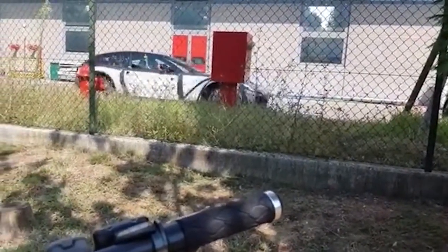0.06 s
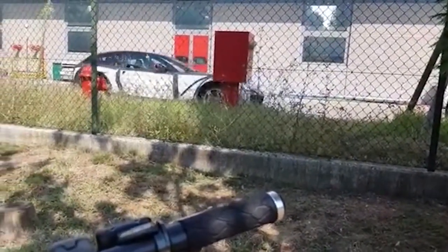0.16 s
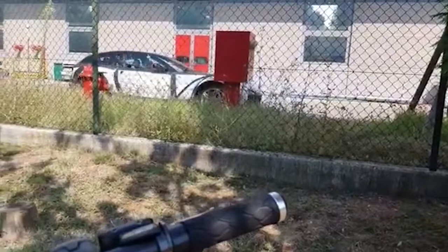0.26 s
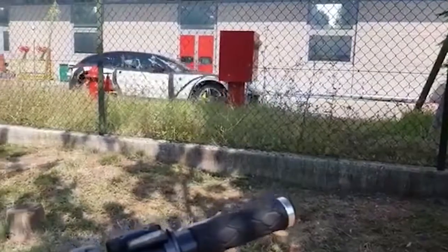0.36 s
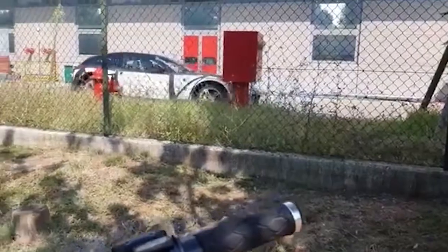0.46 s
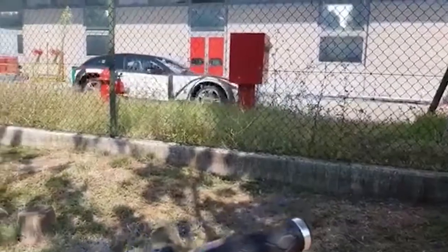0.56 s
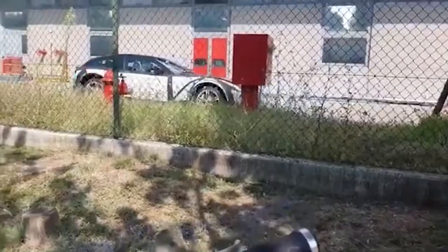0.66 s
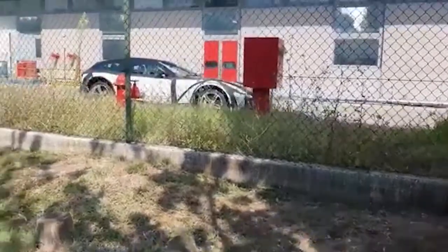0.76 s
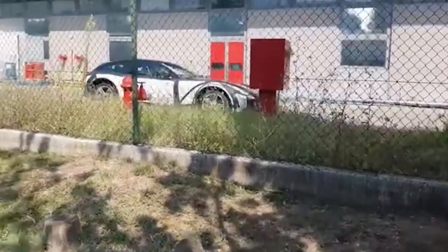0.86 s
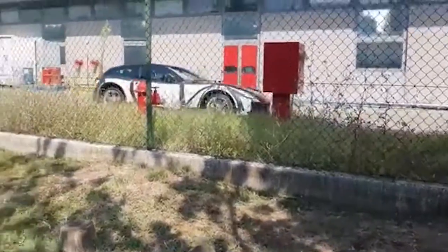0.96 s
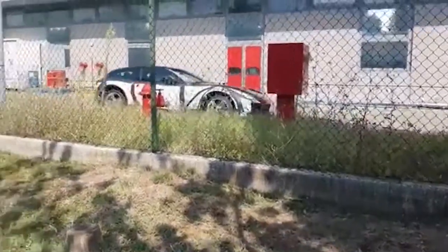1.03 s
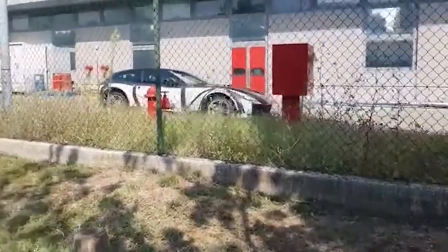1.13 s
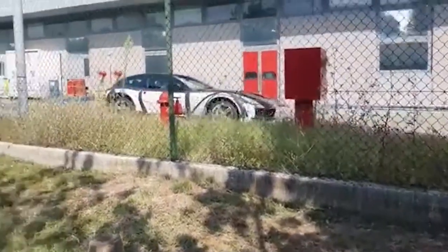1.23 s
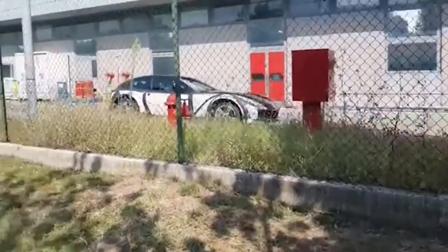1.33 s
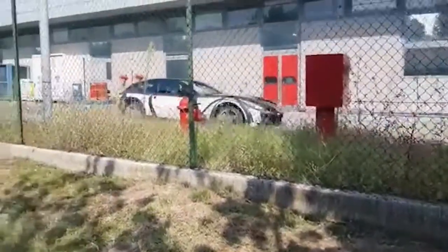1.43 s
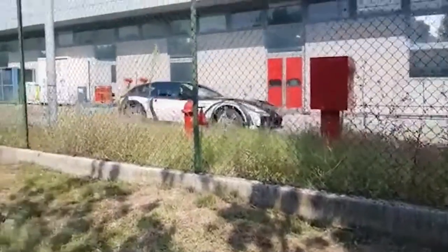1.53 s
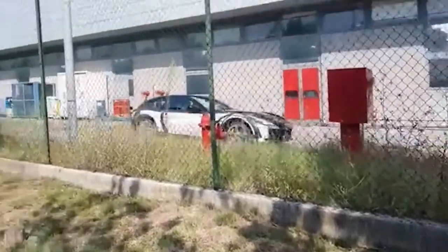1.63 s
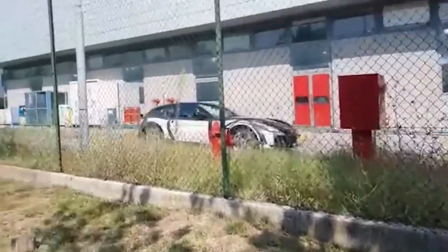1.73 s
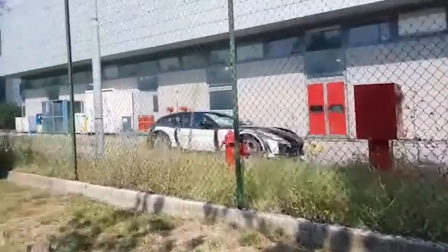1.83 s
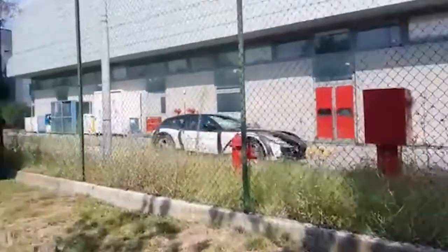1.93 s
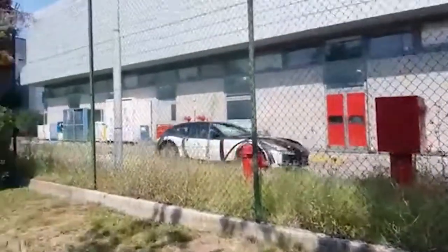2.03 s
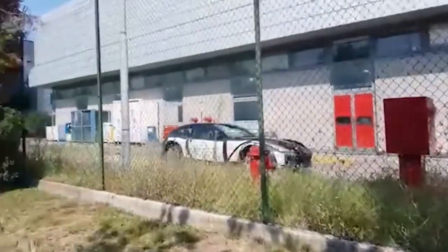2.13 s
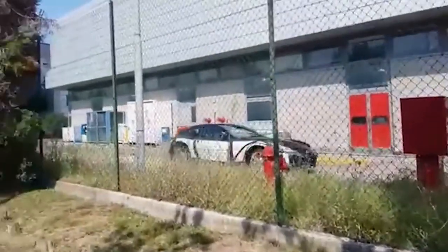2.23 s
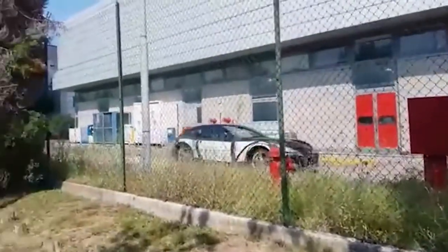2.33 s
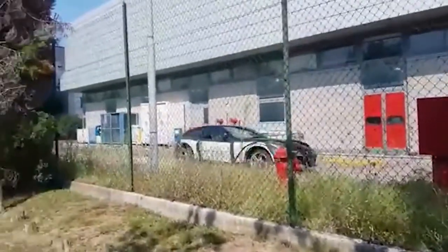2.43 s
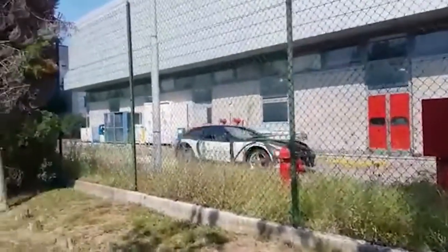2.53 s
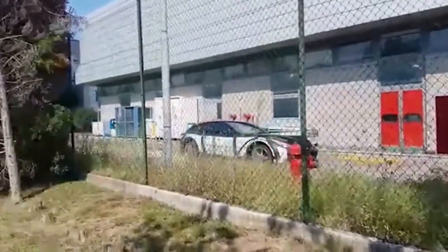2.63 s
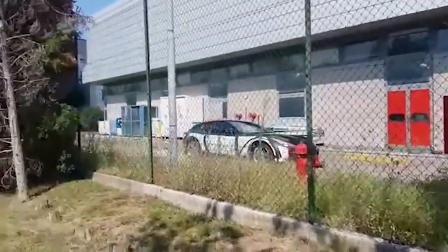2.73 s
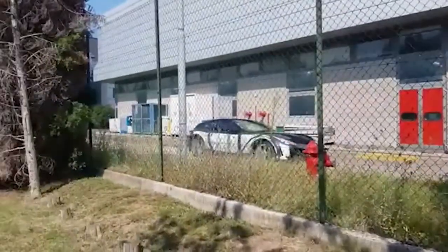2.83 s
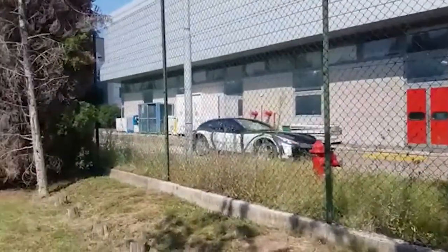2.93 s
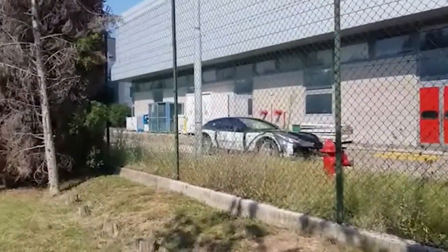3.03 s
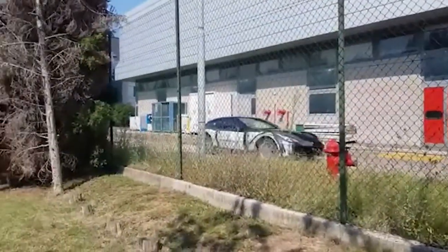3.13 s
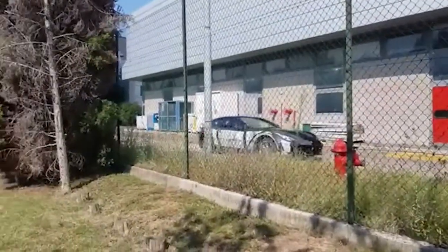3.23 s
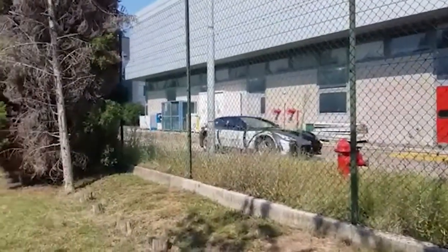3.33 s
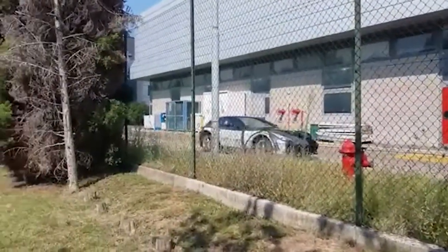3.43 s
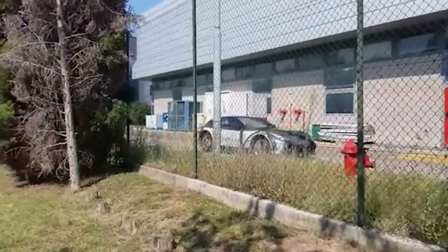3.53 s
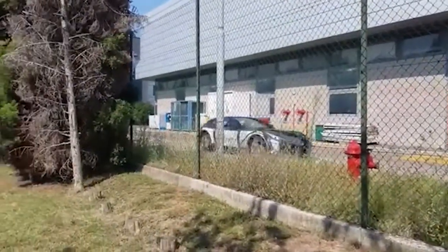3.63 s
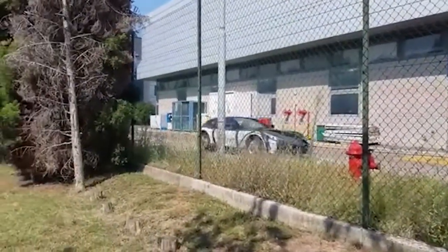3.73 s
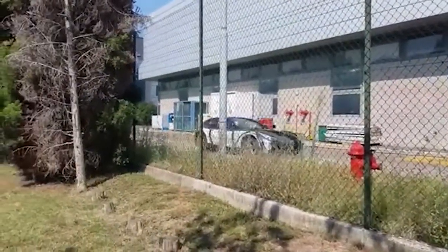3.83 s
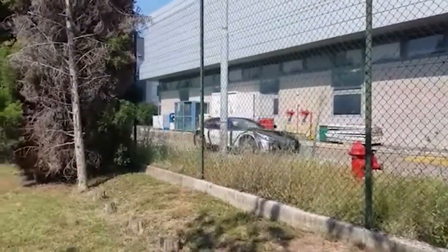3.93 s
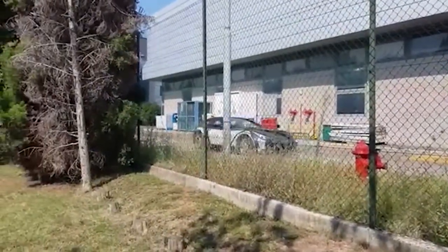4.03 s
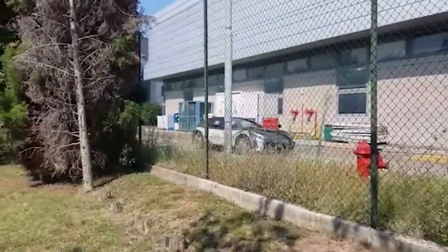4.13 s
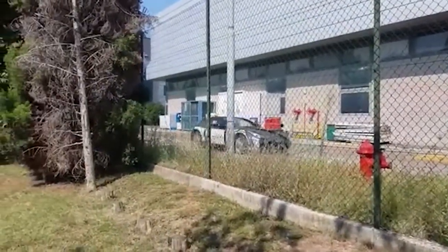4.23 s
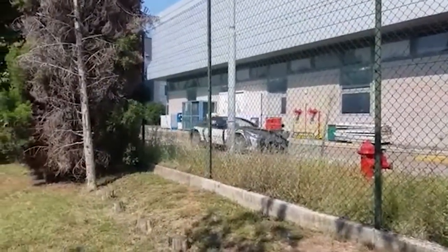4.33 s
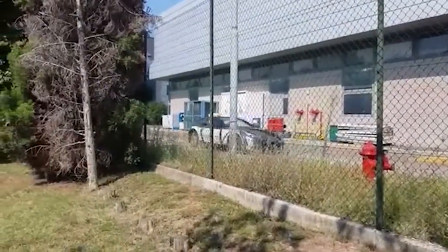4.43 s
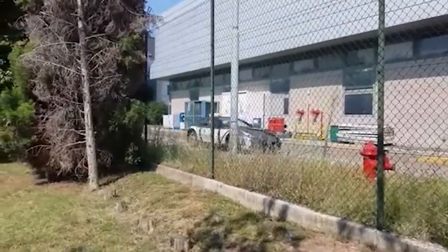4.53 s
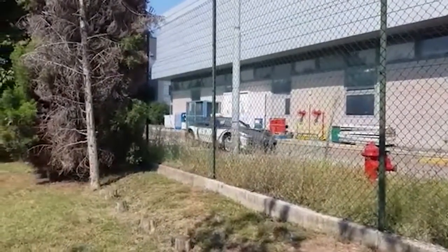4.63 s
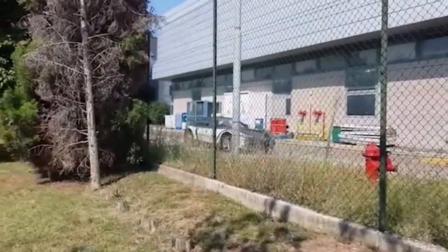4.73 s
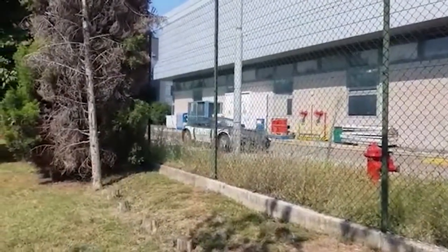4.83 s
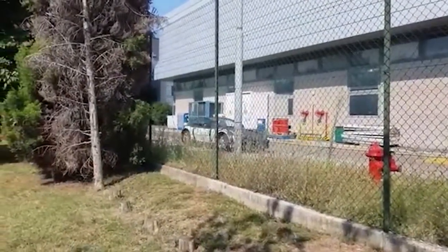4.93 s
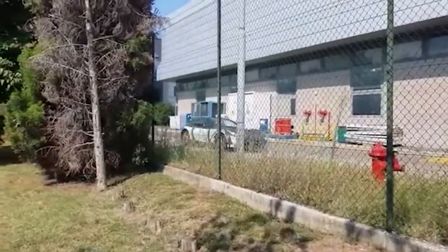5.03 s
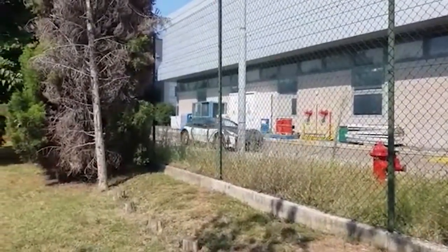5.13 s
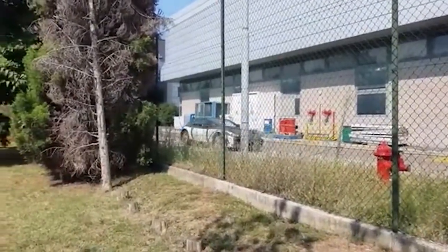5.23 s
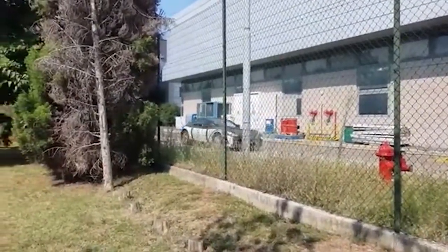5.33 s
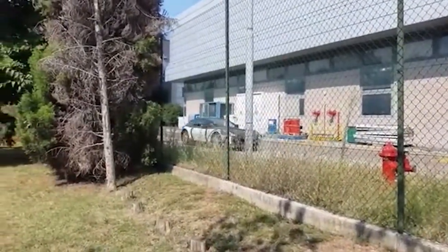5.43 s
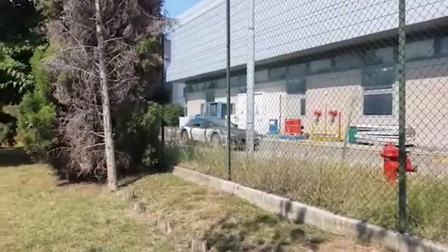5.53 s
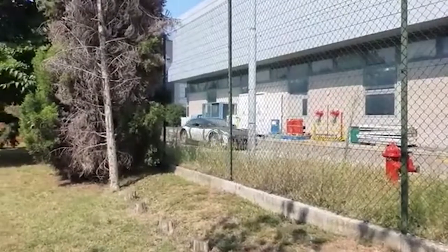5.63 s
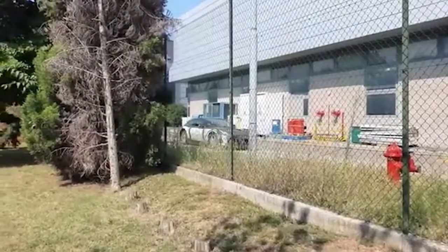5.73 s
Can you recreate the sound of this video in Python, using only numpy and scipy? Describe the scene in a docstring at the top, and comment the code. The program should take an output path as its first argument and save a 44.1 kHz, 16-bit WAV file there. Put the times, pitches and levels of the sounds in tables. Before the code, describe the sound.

A big twelve-cylinder car idles with a deep throbbing boom and burble outdoors, while the hand holding the camera clicks and rubs midway.

```python
"""A twelve-cylinder car creeps across a yard at little more than idle, some way from a hand-held camera.
From the start its exhaust booms, made of tones, and burbles, made of pulses and noise, over engine whirr and hiss.
Faint dry rustles of noise come early, while delayed copies let the wall's echo slide down through the sound.
Near the middle the hand clicks and rubs: pressure pushes, casing rings and noise, mostly in the left microphone.
Then two dull bumps, dying low tones, reach both microphones; a last stroke of skin ends it."""
import sys
import numpy as np
from scipy import signal
from scipy.fft import rfft, irfft
from scipy.io import wavfile

SR = 44100
rng = np.random.default_rng(int(sys.argv[2]) if len(sys.argv) > 2 else 0)


def pcm_store(signal):
    """Save signal as 16-bit PCM."""
    levels = np.round(np.clip(np.atleast_2d(signal), -1, 1) * 32767)
    wavfile.write(sys.argv[1], SR, levels.astype(np.int16).T)


N = 254898
T = np.arange(N) / SR  # time of every sample, in s

# the uneven beat between the two cylinder banks, before trims: [t/s, level/dB]
BANK_BEAT = [(0.03, -60), (0.22, -41.5), (0.4, -32.5), (0.8, -44), (0.94, -57.5), (1.22, -32.5), (1.8, -38),
             (2.3, -37), (2.6, -41.5), (3.4, -43.5), (4.3, -52), (4.7, -43), (5.1, -40.5), (5.7, -38)]


def boom(bank_cycles, boom_db=-0.2, lope_db=0, overtone_db=0.0, port_phase=0.13, left_db=1.0, sway_db=0.3):
    """The lowest exhaust tones: both banks firing, their uneven beat and two overtones, in step so that they throb."""
    # both banks together, swelling and fading as the car rolls, before trims: [t/s, level/dB]
    boom_levels = [(0.03, -20.5), (0.65, -22.5), (1.02, -18.5), (1.18, -23.5), (1.26, -45), (1.32, -24),
                   (1.43, -43), (1.8, -27.5), (2.2, -23.5), (2.48, -29), (2.59, -25), (2.67, -33.5),
                   (2.91, -24.5), (3.38, -26.5), (3.46, -33), (3.89, -28), (4.4, -31.5), (4.47, -39.5),
                   (4.87, -25.5), (5.1, -29), (5.13, -59), (5.19, -32), (5.7, -30), (5.75, -30)]
    # overtones at three and four times the bank rate, before trims: [t/s, third level/dB, fourth level/dB]
    overtone_levels = [(0, -46, -44), (0.25, -33, -36), (0.55, -38.5, -35), (1.1, -36, -38.5),
                       (1.45, -31, -48), (1.8, -39.5, -42), (2.12, -31.5, -51.5), (2.8, -43.5, -48),
                       (3.6, -45, -51), (4.4, -49, -54), (5.1, -58.5, -58), (5.4, -57, -42.5),
                       (5.7, -64, -47.5)]
    shake = 1 + .05 * wander(18)
    slow = wander(.8)
    # echoes off the buildings shift the tone a little between the two microphones
    ports = np.array([[1], [-1]])
    firing = np.cos(2 * np.pi * 2 * bank_cycles + ports * port_phase * slow / 2)
    lean_db = ports * (left_db + sway_db * wander(1.8)) / 2
    out = gain_of(follow(boom_levels)[0] + boom_db + lean_db) * shake * firing
    third_db, fourth_db = follow(overtone_levels)
    orders = [
        (1, follow(BANK_BEAT)[0] + lope_db),
        (3, third_db + overtone_db),
        (4, fourth_db + overtone_db),
    ]
    for k, level_db in orders:
        # a complex factor disturbs both strength and phase
        unrest = 1 + .13 * (wander(9) + 1j * wander(9))
        out += gain_of(level_db) * (unrest * np.exp(2j * np.pi * k * bank_cycles)).real
    return -np.sqrt(2) * out


def car(bank_cycles, pulse_share=0.71, tick_share=0.73, pipe_width_hz=330):
    """Exhaust pulses burble in the pipes over a smooth roar; valve ticks, belts and fans whirr in the engine bay."""
    # the pipes' main resonance drifts as the car rolls on, before its waver: [t/s, f/Hz]
    pipe_curve = [(0, 420), (1.2, 358), (1.6, 361), (2, 364), (2.3, 333), (2.8, 350), (3.6, 312.5),
                  (4.3, 335), (4.8, 373), (5.78, 351)]
    # relative spectra of the burble, the roar, the fans, the engine bay, its whirr and the hiss: [f/Hz, level/dB]
    burble_spectrum = [(100, -18.5), (170, -8), (240, 0), (280, 4), (380, -4.5), (450, -8), (540, -6.5),
                       (660, -9), (800, -26.5), (1300, -26.5), (3000, -72)]
    roar_spectrum = [(110, -13.5), (210, 12), (300, 3), (620, 3), (1000, -64.5)]
    fan_spectrum = [(1800, -24.5), (2500, -1.5), (3000, 4.5), (3500, -6), (4300, -31), (6000, -54.5)]
    bay_spectrum = [(300, -31.5), (600, -0.5), (750, 5.5), (1000, 2.5), (1270, 3.5), (1600, 2),
                    (2100, -25.5), (4000, -83.5)]
    whirr_spectrum = [(800, -3), (1400, -7), (1800, 6.5), (2100, 7), (2500, 2), (3100, -7.5), (3700, -26.5),
                      (4500, -51.5), (7000, -62)]
    hiss_spectrum = [(1500, -33), (3000, 5), (3800, 5.5), (4500, -1.5), (5300, 3.5), (6200, 5), (6550, -6),
                     (6800, -77), (7600, -64)]

    pipe_hz = follow(pipe_curve)[0] + 11 * wander(2.8)
    # the pipe comes through quickly, then fades
    pipe_db = 4 + swell(1.5, rise_db_per_s=5.5, fall_db_per_s=2)
    pulses = yard(firings(bank_cycles, uneven=2.0, jitter=0.068), t60=0.41)
    drive = pulse_share * pulses + puffs(bank_cycles, depth=0.062)
    gas = colour(drive, burble_spectrum)
    exhaust = gas + gain_of(pipe_db) * pipe_ring(gas, pipe_hz, pipe_width_hz)
    # burble grows and roar sinks as the tailpipes come out from behind the bodywork
    burble_db = heard(side_db=-43, turn_db=2) - 3.5 * (1 - opened())
    burble = gain_of(burble_db) * exhaust
    roar_db = heard(side_db=-41.5, turn_db=-14) - 11 * opened()
    roar = gain_of(roar_db) * colour(puffs(bank_cycles, depth=0.12), roar_spectrum)

    # fans behind the grille come forward once the car is nose-on
    fan_db = heard(side_db=-66.5, turn_db=13.5) + 2.1 * wander(18)
    fans = gain_of(fan_db) * colour(puffs(bank_cycles, depth=0.083), fan_spectrum)
    ticks = tick_share * yard(firings(bank_cycles, uneven=3.3, jitter=0.66), t60=0.39) + noise()
    bay_db = heard(side_db=-44, turn_db=-2.5) + 0.7 * wander(25)
    bay = gain_of(bay_db) * colour(ticks, bay_spectrum)
    # the whirr flares as the grille sweeps past the camera
    flare_db = 3 * np.exp(-((T - 2.25) / 0.42) ** 2)
    whirr_db = heard(side_db=-48, turn_db=3) + flare_db + 1.0 * wander(39)
    whirr = gain_of(whirr_db) * colour(ticks, whirr_spectrum)
    # the shifted hand shades the microphones from the hiss
    shade_db = -3 * ease_in(2.4, 0.017)
    hiss_db = heard(side_db=-52, turn_db=-5) + shade_db + 1.5 * wander(20)
    hiss = gain_of(hiss_db) * colour(noise(), hiss_spectrum)
    return passing(burble + roar + fans + bay + whirr + hiss)


def firings(bank_cycles, uneven, jitter, count=12):
    """One pulse a firing; each cylinder has its own strength, and no two cycles are quite alike."""
    at = np.flatnonzero(np.diff(np.floor(2 * bank_cycles)))  # two banks: two firings a cycle
    cylinders = 1 + uneven * evened(rng.standard_normal(count))
    pulses = np.zeros(N)
    pulses[at] = cylinders[np.arange(len(at)) % count] + jitter * rng.standard_normal(len(at))
    return pulses


def puffs(bank_cycles, depth):
    """Gas noise that surges with each firing of a bank."""
    return evened(noise() * (1 + depth * np.cos(2 * np.pi * bank_cycles)))


def pipe_ring(x, hz, width_hz, cut_on_hz=240):
    """The tailpipe's resonance: two resonators in a row, with the bass below them cut steeply."""
    flank = signal.butter(4, cut_on_hz, "high", fs=SR, output="sos")
    ringing = resonate(resonate(x, hz, width_hz), hz, width_hz)
    return evened(signal.sosfilt(flank, ringing))


def heard(side_db, turn_db):
    """Level in dB of one part of the car: it follows the whole car and changes as the car turns."""
    # how much of the car reaches the camera; only its changes around the average count: [t/s, level/dB]
    car_levels = [(0.0, -42), (0.68, -40), (1.88, -42), (2.48, -42), (3.22, -44.5), (3.57, -46),
                  (4.33, -44.5), (5.09, -41.5), (5.78, -41)]
    car_db = follow(car_levels)[0]
    return side_db + turn_db * turned() + car_db - car_db.mean()


def turned():
    """How far the car has swung round: 0 side-on, 1 nose-on."""
    return ease_in(2.18, 0.67)


def opened():
    """How far the tailpipes have come out from behind the bodywork, 0 to 1."""
    return ease_in(1.3, 0.098)


def drone(bank_cycles, unrest=0.52):
    """The tailpipes pick out a few multiples of the bank rate as a faint, wavering drone."""
    # droning tones, as multiples of the bank rate: [multiple]
    drone_orders = (7, 8, 9, 10)
    # their levels side-on, before the waver: [level/dB]
    drone_levels = (-58, -56.5, -53.5, -58)
    out = 0
    for k, level_db in zip(drone_orders, drone_levels):
        waver = 1 + unrest * np.array([wander(1.7) + 1j * wander(2.2) for side in range(2)])
        tone = (waver * np.exp(2j * np.pi * k * bank_cycles)).real
        out = out + gain_of(heard(level_db, turn_db=5.5)) * tone
    return out


def sough(bank_cycles, width_hz=170):
    """A narrow band of the engine bay's rush stands out at first, and sinks as the car rolls."""
    # centre and level of the band: [t/s, f/Hz, level/dB]
    rush_band = [(0, 1320, -53.5), (.6, 1260, -48.5), (.95, 1225, -52), (1.35, 1057, -46), (1.7, 888, -56),
                 (2.3, 795, -70)]
    hz, level_db = follow(rush_band)
    band = resonate(resonate(puffs(bank_cycles, depth=.2), hz, width_hz), hz, width_hz)
    return gain_of(level_db) * evened(band)


def yard(x, t60, change_hz=0.695, count=3):
    """Scattered reflections from ground and wall: different at each microphone, changing as the car rolls."""
    t, out = T[:SR // 3], 0
    for k in range(count):
        # random reflections, dying by 60 dB in t60 seconds
        taps = rng.standard_normal((2, len(t))) * gain_of(-60 * t / t60)
        # slow cosines blend one pattern into the next
        share = np.cos(np.pi * (change_hz * T + k / count))
        out = out + signal.oaconvolve((share * x)[None], taps, axes=1)[:, :N]
    return evened(out)


def passing(x, scatter=0.084, drift=.3, port_gap_s=.0001, count=8):
    """Echoes add delayed copies: the wall's peaks slide down as the car rolls, over a steady hollow tint."""
    # the echo off the wall: [t/s, delay/ms, share of the direct sound]
    wall_echo = [(0, 1.6, 0.25), (0.5, 1.58, 0.24), (0.85, 1.68, 0.24), (1.1, 2.06, 0.41),
                 (1.35, 2.16, 0.23), (1.65, 2.65, 0.43), (2.0, 3.1, 0.22), (2.3, 3.2, 0.29),
                 (3.4, 3.6, 0.45), (4.4, 3.56, 0.075), (5.78, 3.6, 0.023)]

    def delayed(seconds):
        return np.array([np.interp(T - lag, T, side, left=0) for lag, side in zip(seconds, x)])

    wall_ms, wall_share = follow(wall_echo)
    wall_s = wall_ms / 1000
    wall = wall_share * delayed([wall_s, wall_s])
    # a dull, inverted echo makes the car sound slightly hollow
    hollow_s, hollow_top_hz = 4.17 / 1000, 1100
    hollow_share = 0.22 * opened()
    hollow = hollow_share * dulled(delayed([hollow_s, hollow_s]), hollow_top_hz)
    out = x + wall - hollow
    # faint scattered echoes, each with its own drifting delay
    for path, speed, angle in rng.uniform(-1, 1, (count, 3)):
        lag = (.017 + .013 * path) * np.exp(drift * speed * (T - T.mean()))
        out = out + scatter * delayed([lag, lag + port_gap_s * angle])
    # keep the strength about even, however strong the echoes
    return out / np.sqrt(1 + wall_share ** 2 + hollow_share ** 2 + count * scatter ** 2)


def hand(rub_right_db=-16, touch_right_db=-24):
    """Skin rubs as noise; each touch pushes, rings the casing and crackles, mostly in the left microphone."""
    # short strokes of skin over the casing, timed at their strongest: [t/s, level/dB]
    skin_strokes = [(2.407, -35.5), (2.431, -34), (2.47, -26.5), (2.484, -31), (2.58, -32), (2.606, -26.5),
                    (2.783, -33), (5.771, -30.5)]
    # touches: [t/s, press 1 or release -1, push level/dB, push length/ms, crackle level/dB, ring over push/dB]
    touch_rows = [(2.406, -1, -20, .79, -30.5, -17), (2.4102, 1, -27, .4, -25.5, -4.5),
                  (2.427, -1, -14, 0.73, -28, -24), (2.4286, -1, -22, 0.12, -21.5, -12.5),
                  (2.4367, 1, -11.5, 2, -59, -25.5), (2.4623, -1, -14.5, 1.5, -62, -18),
                  (2.467, -1, -10.5, 0.39, -49, -16), (2.4712, -1, -9.5, 0.29, -50, -10.5),
                  (2.4724, -1, -15.5, .35, -48, -9), (2.476, 1, -24, 1.6, -40, -9),
                  (2.4783, 1, -4.5, .19, -22, -15), (2.479, 1, -11.5, 0.75, -41, -26),
                  (2.4827, -1, -33, .12, -25, -6), (2.5414, 1, -20, 0.17, -58, -3),
                  (2.5932, -1, -13.5, 0.21, -57, -3), (2.5936, 1, -11.5, .8, -62, -12),
                  (2.5994, -1, -20.5, .35, -66, -7), (2.605, 1, -11.5, 0.78, -66, -15),
                  (2.7848, 1, -16, 0.25, -66, -9), (2.7849, -1, -15.5, 0.25, -66, -12)]
    # what the casing rings with, each time lowered by 1 to 7 percent: [f/Hz, level/dB, time to fall 60 dB/s]
    casing_tones = [(258, -8.5, 0.043), (560, -15.5, .022), (1000, -9.5, .008), (1530, -15, .016),
                    (1980, -11, 0.018)]
    # relative spectra of the rubbing and the dry crackle: [f/Hz, level/dB]
    rub_spectrum = [(8, -25.5), (22, -5), (50, 3.5), (150, -1), (400, -14.5), (1000, -18.5), (2000, -43),
                    (4000, -72)]
    crackle_spectrum = [(500, 19), (2000, 13), (3300, 14.5), (4400, 5), (5300, 11.5), (6800, 8),
                        (7500, -15), (8200, -32)]
    t = T[:SR // 8]
    skin_hz, crackle_t60_s = 2600, .01
    rubbing = sum(gain_of(db + swell(s, rise_db_per_s=202, fall_db_per_s=283)) for s, db in skin_strokes)
    out = rubbing * colour(noise(), rub_spectrum) * gain_of([[0], [rub_right_db]])
    grit = colour(noise(), crackle_spectrum)
    for s, way, push_db, ms, crackle_db, ring_db in touch_rows:
        ring = 0
        for hz, db, t60 in casing_tones:
            rung_hz = hz * rng.uniform(.93, 0.99)
            ring = ring + gain_of(db - 60 * t / t60) * np.sin(2 * np.pi * rung_hz * t)
        crackle = grit[:, round(s * SR):][:, :len(t)] * gain_of(crackle_db - 60 * t / crackle_t60_s)
        contact = soften(push(t, ms) + gain_of(ring_db) * ring, skin_hz)
        touch = np.sign(way) * gain_of(push_db) * contact + crackle
        add(out, s, touch * gain_of([[0], [touch_right_db]]))
    return out


def push(t, ms):
    """A pressure push that peaks after about ms and relaxes through a shallow dip."""
    u = t / (ms / 1000)
    rise = u * np.exp(1 - u)
    dip = u / 4 * np.exp(1 - u / 4) / 4
    return rise - dip


def soften(x, hz):
    """Soft contact carries little treble above hz."""
    return signal.sosfilt(signal.butter(4, hz, fs=SR, output="sos"), x)


def bumps(knock_hz=620, knock_t60=0.0062, soft_hz=1300):
    """Each bump rocks the camera body, with a short knock on top; both microphones get it."""
    # dull bumps, before softening: [t/s, level/dB, f/Hz, time to fall 60 dB/s, knock over bump/dB]
    bump_rows = [(3.133, -17.5, 100.7, 0.041, -42), (4.608, -12.5, 150.2, 0.024, -7.5)]
    t, out = T[:SR // 8], np.zeros((2, N))
    for s, db, hz, t60, knock_db in bump_rows:
        body = gain_of(-60 * t / t60) * np.sin(2 * np.pi * hz * t)
        knock = gain_of(knock_db - 60 * t / knock_t60) * np.sin(2 * np.pi * knock_hz * t)
        bump = -gain_of(db) * soften(body + knock, soft_hz)
        add(out, s, np.tile(bump, (2, 1)))
    return out


def rustles(rise_db_per_s=350, fall_db_per_s=300):
    """Faint dry rustles close to the camera: noise that quickly swells and fades."""
    # rustles, timed at their strongest: [t/s, level/dB]
    rustle_rows = [(0.63, -47.5), (0.82, -50), (1.09, -58), (1.43, -44.5)]
    # their relative spectrum: [f/Hz, level/dB]
    rustle_spectrum = [(1800, -39), (2600, 0), (3050, 5.5), (3700, -11.5), (5300, -10.5), (6800, -46.5)]
    strength = sum(gain_of(db + swell(s, rise_db_per_s, fall_db_per_s)) for s, db in rustle_rows)
    return strength * colour(noise(), rustle_spectrum)


def rumble(rumble_db=2.65, follows=0.8, air_db=-45):
    """Turbulent exhaust flow swells with the beat of the banks; light air stirs at each microphone alone."""
    # relative spectrum of the flow: [f/Hz, level/dB]
    rumble_spectrum = [(10, -27.5), (25, -19), (38, 4), (50, 12.5), (70, 11), (110, 14.5), (160, 6),
                       (260, -27), (800, -74)]
    level_db = follow(BANK_BEAT)[0]
    average_db = level_db.mean()
    flow_db = rumble_db + average_db + follows * (level_db - average_db)
    flow = gain_of(flow_db) * colour(noise(), rumble_spectrum)
    return flow + gain_of(air_db) * np.array([wander(65), wander(46)])


def noise():
    """Two unrelated white noises."""
    return rng.standard_normal((2, N))


def wander(hz):
    """Random movement of rms 1, mostly slower than hz."""
    return evened(dulled(rng.standard_normal(N), hz))


def colour(pair, spectrum):
    """Shapes two unrelated signals and blends them into left and right, their likeness set by pitch."""
    # how alike the microphones are, limited to the range -1 to 1: [f/Hz, likeness]
    likeness = [(30, 0), (100, 0.85), (240, 1.16), (470, 0.75), (900, 0.02), (1800, 0), (3600, -0.07),
                (7000, 0)]
    # how much louder the left microphone is: [f/Hz, left minus right/dB]
    left_lean = [(30, 21.5), (100, 0.9), (300, 1.5), (850, 0.4), (1500, 0.2), (2500, 1), (6500, 0.88)]
    a, b = rfft(pair, axis=1)
    same = np.clip(read(likeness), -1, 1)
    lean = gain_of(read(left_lean) / 2)
    left = a * lean
    right = (same * a + np.sqrt(1 - same ** 2) * b) / lean
    return evened(irfft(np.array([left, right]) * gain_of(read(spectrum)), N, axis=1))


def resonate(x, hz, width):
    """A resonance of gain 1 that follows the curve hz: shift down to 0 Hz, smooth, shift back up."""
    turn = np.exp(2j * np.pi * np.cumsum(hz) / SR)
    r = np.exp(-np.pi * width / SR)
    return 2 * (turn * signal.lfilter([1 - r], [1, -r], x / turn)).real


def dulled(x, hz):
    """Takes the treble off without delaying the sound."""
    return irfft(rfft(x) / (1 + (np.fft.rfftfreq(N, 1 / SR) / hz) ** 4), N)


def ease_in(middle_s, ease_s):
    """A smooth change from 0 to 1 around middle_s; a larger ease_s makes it more gradual."""
    return .5 + .5 * np.tanh((T - middle_s) / (2 * ease_s))


def swell(s, rise_db_per_s, fall_db_per_s):
    """Level in dB that climbs to 0 at time s and falls again."""
    return -np.maximum(rise_db_per_s * (s - T), fall_db_per_s * (T - s))


def gain_of(db):
    """Decibels to a factor."""
    return 10 ** (np.asarray(db) / 20)


def evened(x):
    """Scales to rms 1."""
    return x / np.sqrt(np.mean(x ** 2) + 1e-20)


def follow(rows):
    """Each column of a curve table at every sample."""
    s, *columns = np.transpose(rows)
    return [np.interp(T, s, column) for column in columns]


def read(points):
    """A spectrum table at every frequency bin, with straight lines along log frequency."""
    f, value = np.transpose(points)
    return np.interp(np.log(np.fft.rfftfreq(N, 1 / SR) + 1), np.log(f + 1), value)


def add(mix, s, sound):
    """Mixes a stereo sound in at time s."""
    part = mix[:, round(s * SR):][:, :sound.shape[1]]
    part += sound[:, :part.shape[1]]


def scene():
    """One shared engine rhythm drives the firing sounds; hand, bumps and rustles join them."""
    # firing rate of one bank, before a tiny random waver; the idle hunts up and down, twice: [t/s, f/Hz]
    idle_rate = [(0, 35.72), (.3, 37.19), (.7, 38.18), (1.2, 37.64), (1.45, 35.9), (1.8, 35.6), (3, 35.48),
                 (3.6, 35.98), (4.2, 37.69), (4.9, 38.14), (5.3, 36.54), (5.6, 34.76)]
    bank_hz = follow(idle_rate)[0] * (1 + 0.000979 * wander(4.94))
    bank_cycles = np.cumsum(bank_hz) / SR
    engine = boom(bank_cycles) + car(bank_cycles) + drone(bank_cycles) + sough(bank_cycles)
    return engine + hand() + bumps() + rustles() + rumble()


def record(dry):
    """The recorder's low cut and band limit."""
    low_cut_hz, edge_hz = 6, 7700
    cut = dry - dulled(dry, low_cut_hz)
    band_limit = signal.firwin(511, edge_hz, window=("kaiser", 9), fs=SR)
    return signal.oaconvolve(cut, band_limit[None], "same")


dry = scene()
out = record(dry)
pcm_store(out)
```